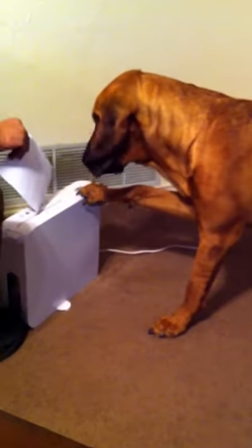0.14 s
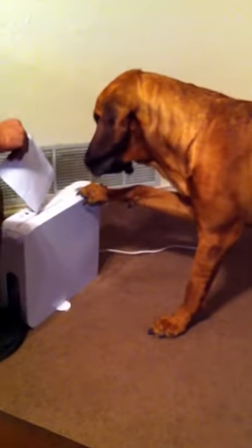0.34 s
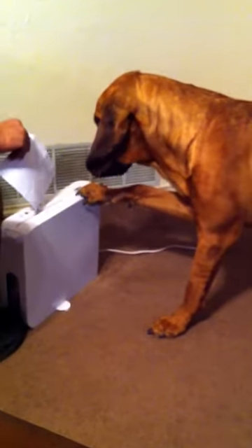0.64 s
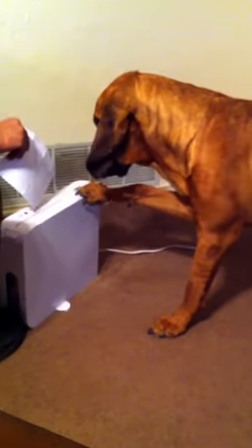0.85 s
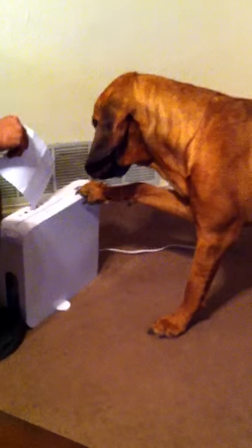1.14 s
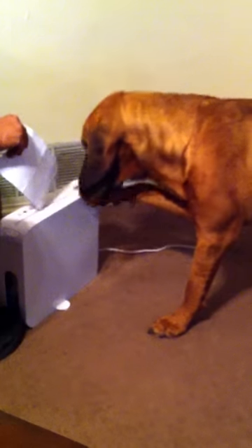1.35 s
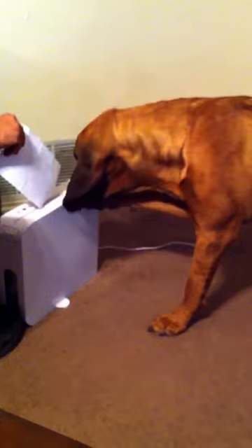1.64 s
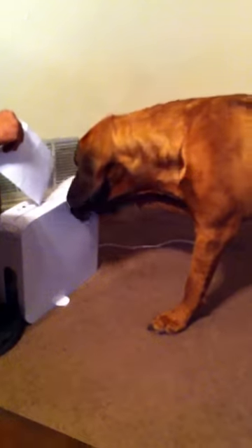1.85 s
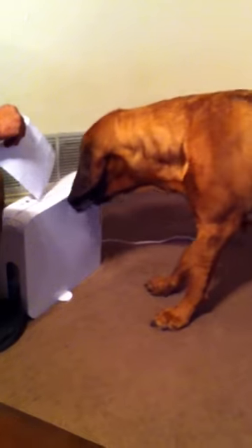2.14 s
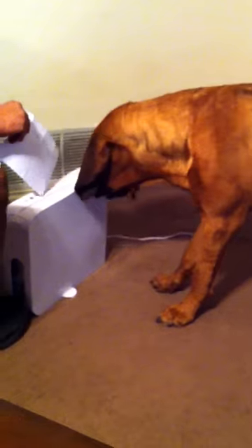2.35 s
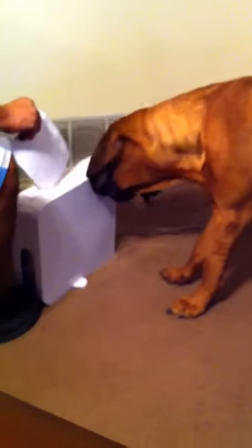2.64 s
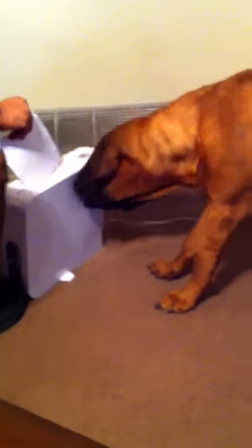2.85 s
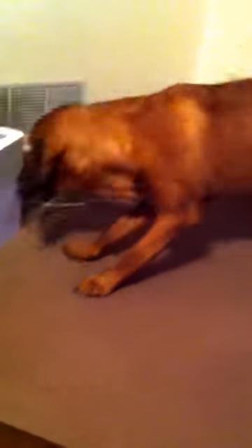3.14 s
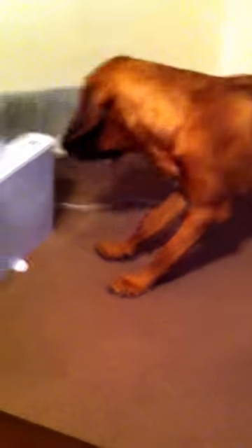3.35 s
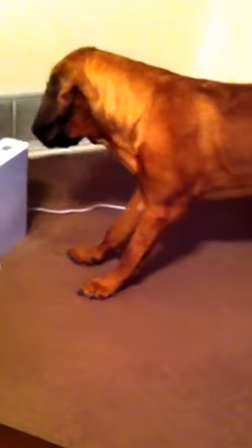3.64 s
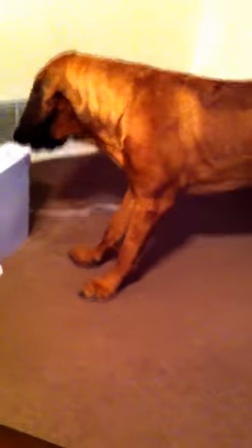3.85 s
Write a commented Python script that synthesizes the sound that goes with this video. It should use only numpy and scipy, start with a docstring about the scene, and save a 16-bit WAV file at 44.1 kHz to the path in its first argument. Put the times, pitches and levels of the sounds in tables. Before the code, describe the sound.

A paper shredder runs only in the last second. First, a quiet carpeted room with hiss and low murmur: faint case taps and rustles at 0.1-0.3 s, claw scrapes near 1.45 s, a sharper knock at 2.0 s with soft paw thuds until 2.3 s. At 3.04 s a click starts the motor; its whine rises, then from 3.4 s loud tearing, grinding and bright snaps continue to the end at 4 s.

```python
"""A paper shredder runs: mains hum, a rumble, a whine, grinding gears, and paper that tears and snaps.
Motor tones are sinusoids; grinding and tearing are coloured noise; crackle and snaps are tiny clicks.
Before it switches on, a dog taps and scratches its plastic case (scrapes exciting resonances), its pads
land on carpet (decaying low sines with dull puffs), and a sheet rustles in swells of noise.
A quiet carpeted room adds echoes, hiss and a low murmur; one microphone is close by."""
import sys
import numpy as np
from scipy import signal
from scipy.io import wavfile
from scipy.ndimage import uniform_filter1d

SR = 44100
rng = np.random.default_rng(int(sys.argv[2]) if len(sys.argv) > 2 else 0)


def to_wav(s):
    """Save 16-bit WAV."""
    ch = np.atleast_2d(s).T  # columns
    pcm = np.round(np.clip(ch, -1, 1) * 32767)  # PCM
    wavfile.write(sys.argv[1], SR, pcm.astype(np.int16))


def invert_db(level):
    """Linear amplitude ratio for a level in decibels (20 dB per decade), elementwise."""
    return 10 ** (np.asarray(level, dtype=float) / 20)


N = 176400


def evened(x):
    """Energy normalisation: scales a signal to rms 1."""
    return x / np.sqrt(np.mean(x ** 2) + 1e-20)


def read(points, hz):
    """Logarithmic frequency scale: interpolates a spectrum or decay curve along log f."""
    f, value = np.transpose(points)
    return np.interp(np.log(hz + 1), np.log(f + 1), value)


def envelopes(points):
    """Slow modulation: joins each column of a time table by straight lines."""
    times, *columns = np.transpose(points)
    return [np.interp(np.arange(N) / SR, times, column) for column in columns]


def add(mix, s, sound):
    """Superposition: adds a sound to the mix from time s on."""
    part = mix[round(s * SR):][:len(sound)]
    part += sound[:len(part)]


def noise(spectrum, patchy_db, size=1024):
    """Coloured Gaussian noise: random short-time spectra with drifting patches, rms 1."""
    frames, hz = 4 * N // size + 5, np.fft.rfftfreq(size, 1 / SR)
    real, imaginary, patches = rng.standard_normal((frames, len(hz), 3)).T
    patches = uniform_filter1d(patches, size // 80, 0)  # smooth along frequency
    patches = evened(uniform_filter1d(patches, 8192 // size, 1))  # smooth along time
    gain_db = read(spectrum, hz)[:, None] + patchy_db * patches
    spectra = (real + 1j * imaginary) * invert_db(gain_db)
    return evened(signal.istft(spectra, nperseg=size, noverlap=3 * size // 4)[1][:N])


def resonate(x, hz, width):
    """Resonance of gain 1: shifts x down by hz (fixed or a curve), low-passes it and shifts it back."""
    turn = np.exp(2j * np.pi * np.cumsum(hz * np.ones(len(x))) / SR)
    r = np.exp(-np.pi * width / SR)
    return 2 * (turn * signal.lfilter([1 - r], [1, -r], x / turn)).real


def colour(x, gain_db):
    """Minimum-phase filtering: the Hilbert transform of the log gain makes gain_db(hz) causal."""
    hz = abs(np.fft.fftfreq(2048, 1 / SR))
    log_gain = np.log(invert_db(np.maximum(gain_db(hz), -100)))
    impulse = np.fft.ifft(np.exp(np.conj(signal.hilbert(log_gain)))).real
    return signal.fftconvolve(x, impulse)


def grain(hz, cycles):
    """Damped oscillation: a tiny click of a few cycles, peak about 1."""
    u = np.arange(300) * hz / SR / cycles
    return np.e * 3 * u * np.exp(-3 * u) * np.sin(2 * np.pi * u * cycles)


def house():
    """Stationary background noise: microphone hiss, with a low murmur of the house that swells and sinks."""
    # Room tone: f/Hz, relative density level/dB
    floor_spectrum = [(18, -72), (30, -42), (64, -40), (109, -19), (138, -18.5), (170, -3), (210, -15.5),
                      (239, 8), (303, -17), (328, -10), (364, -5.5), (437, -6.5), (616, -14), (740, -10.5),
                      (844, -13.5), (913, -14.5), (2680, -21.5), (11100, -22.5), (16000, -24.5)]
    # Murmur below about 600 Hz: t/s, gain/dB
    murmur = [(0, 1.5), (.4, 1), (.8, 0), (1.2, -0.5), (1.55, 4), (1.9, -2), (2.4, 1), (2.7, 1), (3, 0)]
    tone = noise(floor_spectrum, patchy_db=0.96)
    low = signal.filtfilt(*signal.butter(2, 600, fs=SR), tone)
    gain_db, = envelopes(murmur)
    return invert_db(-60.5) * (tone + low * (invert_db(gain_db) - 1))


def rustles():
    """Amplitude modulation: Gaussian swells of fine paper noise from the held sheet."""
    # Swells: middle t/s, half length/s, level/dB
    swells = [(0.261, 0.036, -61.5), (0.312, 0.031, -56.5), (1.47, 0.06, -64), (1.575, 0.028, -64),
              (2.05, 0.05, -58.5), (2.24, 0.048, -65), (2.553, 0.034, -66), (2.895, 0.078, -63.5)]
    # Paper noise: f/Hz, relative density level/dB
    sheet_spectrum = [(590, -20), (1000, -0.5), (2100, -3), (2840, -1.5), (6110, -4), (9380, 1.5),
                      (16000, -9)]
    t = np.arange(N) / SR
    envelope = sum(invert_db(db) * np.exp(-((t - s) / half) ** 2) for s, half, db in swells)
    return envelope * noise(sheet_spectrum, patchy_db=-1.0, size=256)


def thud(level_db, hz, t60):
    """Damped oscillator: a low push dies exponentially, with a short dull puff of noise."""
    puff_db, puff_band_hz, puff_s = -3, [170, 850], .012
    t = np.arange(8000) / SR
    band = signal.butter(2, puff_band_hz, "band", fs=SR, output="sos")
    puff = evened(signal.sosfilt(band, rng.standard_normal(len(t))))
    puff = invert_db(puff_db) * puff * (0.34 + 0.46 * np.exp(-t / puff_s))
    decay = invert_db(level_db - 60 * t / max(t60, .01))
    rise = np.minimum(t / 0.0016, 1)
    return decay * rise * (np.sin(2 * np.pi * hz * t) + puff)


def thuds():
    """Impacts on a soft surface: pads land on carpet."""
    # Landings: t/s, level of the sine before decay/dB, f/Hz, T60/s
    landings = [(1.604, -49, 250, 0.054), (1.806, -54, 258, .06), (2.007, -38.5, 189, 0.12),
                (2.196, -37.5, 214, 0.073), (2.232, -45, 192, 0.17), (2.288, -56, 200, 0.045),
                (2.658, -44.5, 376, 0.032)]
    sound = np.zeros(N)
    for s, *row in landings:
        add(sound, s, thud(*row))
    return sound


def tap(level_db, spot_hz, tilt_db, length):
    """Forced resonance: a brief scrape rings the case, with one broad mode at the struck spot."""
    # Scrape colour: f/Hz, relative density level/dB
    claw_spectrum = [(60, -50), (120, -8), (234, -14), (490, -14), (700, 3), (1500, 3), (2300, -5.5),
                     (3300, -4), (6000, -15), (11600, -14), (16000, -25)]
    # Case modes: f/Hz, level/dB, decay setting/s (bandwidth in Hz is 3.8 over this)
    case_modes = [(199, 2.5, 0.05), (655, 9, 0.051), (1210, -2.5, 0.028), (1642, -11, .03),
                  (2320, -5, 0.016), (2810, -32, 0.022)]
    rise_s, case_db, spot_db, spot_sharpness = .0015, -2.5, -3, 2.4
    t = np.arange(2600) / SR
    envelope = np.minimum(t / rise_s, 1) * np.exp(-t / max(length, .001))
    scrape = rng.standard_normal(len(t)) * envelope
    ring = sum(invert_db(db) * resonate(scrape, hz, 3.8 / decay) for hz, db, decay in case_modes)
    spot_width = spot_hz / spot_sharpness
    spot = resonate(resonate(scrape, spot_hz, spot_width), spot_hz, spot_width)
    contact = colour(scrape, lambda f: read(claw_spectrum, f))[:len(t)]
    body = evened(contact) + invert_db(case_db) * evened(ring)
    tilted = colour(body, lambda f: tilt_db * np.log2((f + 200) / 2000))[:len(t)]
    sound = evened(tilted) + invert_db(spot_db) * evened(spot)
    loudest = np.sqrt(uniform_filter1d(sound ** 2, 200).max())
    return invert_db(level_db - 9) * sound / loudest  # short-time rms lies 9 dB under the nominal peak


def taps():
    """Impact excitation: knocks on the case, by claws and at the end by the switch."""
    # Knocks: t/s, nominal peak level/dB, f of the struck spot/Hz, brightness/(dB/octave),
    # scrape decay constant/s
    knocks = [(0.092, -41.5, 1870, -3.5, .014), (0.113, -48.5, 1660, 0.5, .01),
              (0.306, -47.5, 1480, -5, 0.006), (1.438, -40.5, 673, -.5, .015), (1.46, -36, 2280, 3, 0.0067),
              (1.473, -43.5, 860, -1.5, 0.0076), (1.665, -51.5, 1390, -4, .009),
              (1.978, -38.5, 1700, -3, 0.0059), (1.991, -31, 10600, 0.5, 0.0087), (2, -25.5, 2030, 3, .005),
              (2.011, -30, 1080, 3.5, 0.002), (2.017, -47, 2400, -5, 0.0035), (2.046, -39, 1320, 3, 0.0082),
              (2.531, -50, 1700, 0, 0.011), (3.04, -32.5, 8400, 8, 0.0072), (3.051, -37.5, 610, -5, 0.0053)]
    sound = np.zeros(N)
    for s, *row in knocks:
        add(sound, s, tap(*row))
    return sound


def motor():
    """Periodic excitation: hum at twice the mains, housing rumble, and a fuzzy whine with companions."""
    # Motor: t/s, hum level/dB, rumble level/dB
    motor_levels = [(3.04, -62, -55), (3.052, -57, -46), (3.072, -46.5, -48), (3.338, -60, -46.5),
                    (3.384, -56, -46), (3.496, -64, -43), (3.506, -57.5, -40), (3.596, -54, -48.5),
                    (3.622, -68, -45), (3.678, -68, -41.5), (3.71, -58, -41.5), (3.742, -50, -46.5),
                    (3.814, -66.5, -46), (4.0, -58, -41.5)]
    # Hum partials: multiple of the hum frequency, relative level/dB
    hum_partials = [(1, -6.5), (2, -9), (3, -13)]
    # Housing rumble: f/Hz, relative density level/dB
    rumble_spectrum = [(24, -67), (40, -39), (193, -1), (235, -7.5), (326, -4), (440, -7), (563, -8),
                       (676, -15), (900, -17.5), (1170, -20), (1980, -120)]
    # Whine: t/s, f/Hz, level/dB
    whine_track = [(3.04, 531, -67), (3.251, 537.3, -57.5), (3.332, 553.9, -48), (3.402, 573.3, -45.5),
                   (3.47, 573.6, -47.5), (3.55, 572.4, -46.5), (3.61, 577.8, -45.5), (3.66, 577.5, -47.5),
                   (3.71, 569.8, -44), (3.76, 564.5, -48), (3.82, 555, -58), (4, 554, -61)]
    # Whine and companions: frequency ratio, relative level/dB
    whine_orders = [(1, -0.5), (1.685, -7), (.565, -7), (.325, -6), (2.4, -10.5), (1.065, -8.5)]
    hum_hz, whine_width_hz, whine_fuzz = 119.3, 16, .25
    t = np.arange(N) / SR
    hum_db, rumble_db = envelopes(motor_levels)
    hz, whine_db = envelopes(whine_track)
    hum = evened(sum(invert_db(db) * np.cos(2 * np.pi * k * hum_hz * t) for k, db in hum_partials))
    whine = np.zeros(N)
    for k, db in whine_orders:
        tone = np.sqrt(2) * np.sin(2 * np.pi * k * np.cumsum(hz) / SR)
        fuzz = evened(resonate(rng.standard_normal(N), k * hz, whine_width_hz))
        whine += invert_db(db) * (tone + whine_fuzz * fuzz)
    rumble = noise(rumble_spectrum, patchy_db=1.5, size=2048)
    return invert_db(hum_db) * hum + invert_db(rumble_db) * rumble + invert_db(whine_db) * whine


def cutters():
    """Shot noise: tearing paper is hiss plus a dense random train of tiny clicks, over grinding gears."""
    # Cutters: t/s, grind level/dB, low tearing level/dB, high tearing level/dB
    cutter_levels = [(3.04, -56, -60, -49), (3.056, -51, -55, -61), (3.1, -54, -57, -52.5),
                     (3.148, -55.5, -55, -51), (3.164, -46, -45, -46.5), (3.21, -46.5, -51.5, -42),
                     (3.242, -41, -47, -41.5), (3.282, -44.5, -46.5, -44), (3.41, -45.5, -46, -38.5),
                     (3.428, -45, -38, -38), (3.44, -47, -43.5, -37), (3.458, -37, -36.5, -36),
                     (3.496, -45.5, -43.5, -36), (3.53, -42, -40, -34.5), (3.575, -41, -39, -38),
                     (3.592, -39, -35, -32), (3.64, -41.5, -41.5, -39), (3.7, -44, -43, -36),
                     (3.722, -45, -37, -34.5), (3.764, -44, -39.5, -36), (3.8, -39.5, -39.5, -32.5),
                     (3.89, -44.5, -39, -34), (3.918, -41, -35.5, -33), (3.975, -44.5, -36.5, -37.5),
                     (4, -37.5, -33.5, -30)]
    # Gear grind: f/Hz, relative density level/dB
    grind_spectrum = [(350, -30), (600, -1.5), (681, -4.5), (966, -2), (1710, -6.5), (1840, -6),
                      (4000, -17), (5200, -27), (8800, -120)]
    # Tearing: f/Hz, relative density level/dB
    tear_spectrum = [(1290, -20), (2200, -10), (3140, -5.5), (3680, -6.5), (4720, -3.5), (7710, -4),
                     (9640, 2), (12400, -2.5), (15100, -6), (16000, -11)]
    clicks_per_s, crackle_db, spread_db, split_hz = 1200, -5, 2.5, 6840
    bite_s, before_bite_db = 3.41, -7  # the crackle is weaker until the sheet is fully caught
    t = np.arange(N) / SR
    grind_db, low_db, high_db = envelopes(cutter_levels)
    present = rng.random(N) < clicks_per_s / SR
    pick = rng.integers(0, 16, N)  # pitch class of each click
    size = np.minimum(rng.exponential(1, N), 4)
    clicks = present * invert_db(spread_db * size) * rng.choice([-1, 1], N)
    crackle = np.zeros(N)
    for k, hz in enumerate(np.geomspace(2800, 12500, 16)):
        pitched = signal.oaconvolve(clicks * (pick == k), grain(hz, cycles=2.06))[:N]
        crackle += invert_db(read(tear_spectrum, hz)) * hz * pitched
    hiss = noise(tear_spectrum, patchy_db=2.0, size=256)
    tear = hiss + invert_db(crackle_db + before_bite_db * (t < bite_s)) * evened(crackle)
    low = signal.filtfilt(*signal.butter(2, split_hz, fs=SR), tear)
    grind = noise(grind_spectrum, patchy_db=2.0, size=512)
    return invert_db(grind_db) * grind + invert_db(low_db) * evened(low) + invert_db(high_db) * evened(tear - low)


def snap(level_db, hz):
    """Impulsive fracture: one sharp click, then a short decaying spray of smaller ones."""
    tail_s, tail_db = 0.0039, -11.5
    t = np.arange(900) / SR
    spray = rng.standard_normal(900) * (rng.random(900) < .15)
    spray *= invert_db(tail_db) * np.exp(-t / tail_s)
    spray[0] = 1
    return invert_db(level_db) * np.convolve(spray, grain(hz, cycles=1.2))


def snaps():
    """Transient sources: loud snaps of paper in the cutters."""
    # Snaps: t/s (add 1.2 ms for the start of the click), approximate click peak level/dB, f/Hz
    snap_events = [(3.1597, -34, 4570), (3.187, -23.5, 10200), (3.4204, -24, 9800), (3.4244, -12, 11400),
                   (3.4306, -16.5, 4580), (3.4491, -17, 4053), (3.455, -4.5, 11900), (3.46, -19, 12800),
                   (3.4647, -15, 12100), (3.4656, -17, 10400), (3.5066, -11.5, 10900), (3.5404, -13, 10100),
                   (3.5827, -14, 6600), (3.593, -15.5, 6640), (3.6646, -13, 9600), (3.71, -16, 9740),
                   (3.718, -23, 9500), (3.7234, -12, 9600), (3.7668, -18, 8590), (3.7923, -10.5, 9270),
                   (3.8406, -9.5, 9080), (3.8474, -12, 12100), (3.8996, -14, 10900), (3.9494, -12, 11700),
                   (3.9534, -11.5, 8830), (3.9578, -15, 8990), (3.978, -16, 9390), (3.9901, -17, 9450),
                   (3.9934, -8.5, 10000)]
    sound = np.zeros(N)
    for s, *row in snap_events:
        add(sound, s + .0012, snap(*row))
    return sound


def room(x):
    """Reverberation: sparse echoes of random sign, each band dying at its own speed."""
    # Reverberation time: f/Hz, T60/s
    reverberation = [(150, 0.44), (1000, 0.39), (4000, 0.34), (12000, 0.16)]
    echoes = np.zeros(SR // 2)
    at = np.arange(200, len(echoes) - 20, 20)
    echoes[at + rng.integers(0, 20, len(at))] = rng.choice([-1., 1.], len(at))
    hz, t, z = signal.stft(echoes, SR, nperseg=256)
    decay = invert_db(-60 * t / read(reverberation, hz)[:, None])
    tail = signal.istft(z * decay, SR, nperseg=256)[1]
    return signal.fftconvolve(x, tail / np.linalg.norm(tail))[:N]


def scene():
    """Superposition: hits with their echoes, rustles, the running shredder and the house, alike in two channels."""
    on_s, fade_s, room_db = 3.039, 0.011, -5
    hits = taps() + thuds() + snaps()
    running = np.clip((np.arange(N) / SR - on_s) / fade_s, 0, 1)
    shredder = running * (motor() + cutters())
    mono = hits + invert_db(room_db) * room(hits) + rustles() + shredder + house()
    return np.array([mono, mono])


def roll_off(x):
    """The treble ends steeply here."""
    return signal.sosfilt(signal.butter(12, 16170, fs=SR, output="sos"), x)


def record(dry):
    """Band limitation: the small microphone drops deep bass and top treble."""
    low_hz, top_hz = 75, 15430
    x = signal.sosfilt(signal.butter(2, low_hz, "high", fs=SR, output="sos"), dry)
    x = signal.sosfiltfilt(signal.butter(16, top_hz, fs=SR, output="sos"), x)
    return roll_off(x)


dry = scene()
out = record(dry)
to_wav(out)
```